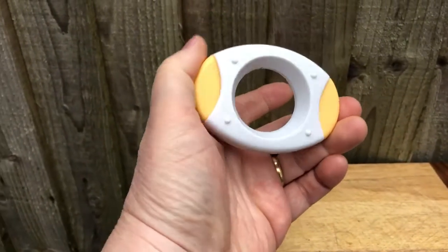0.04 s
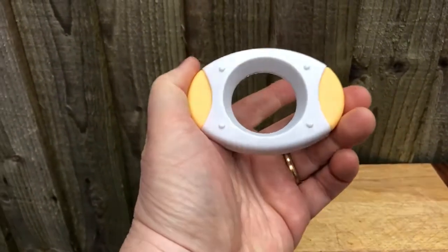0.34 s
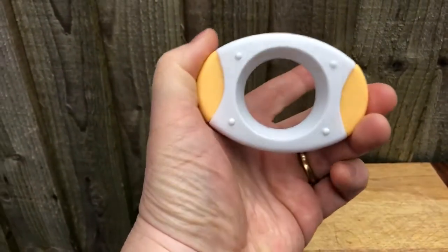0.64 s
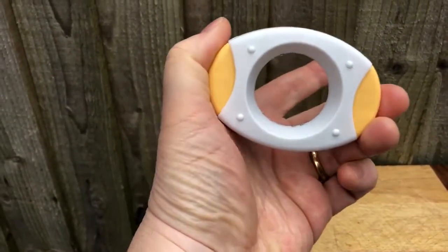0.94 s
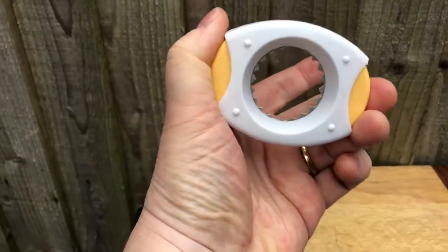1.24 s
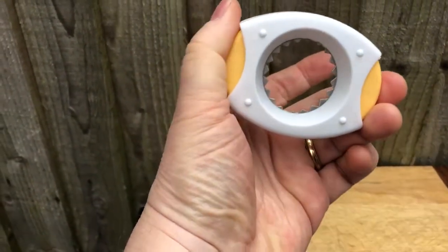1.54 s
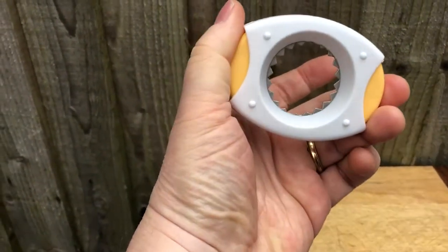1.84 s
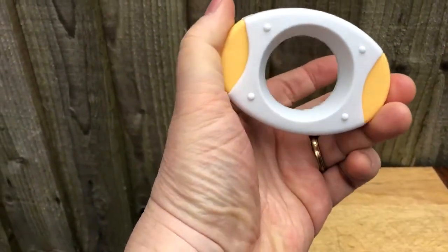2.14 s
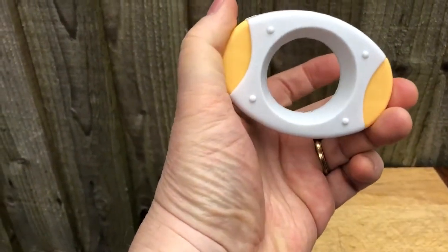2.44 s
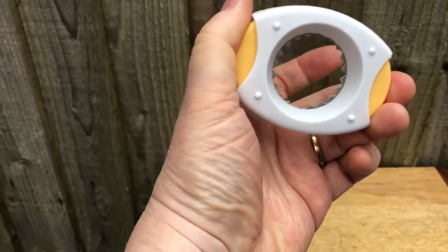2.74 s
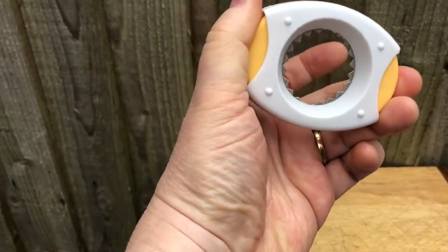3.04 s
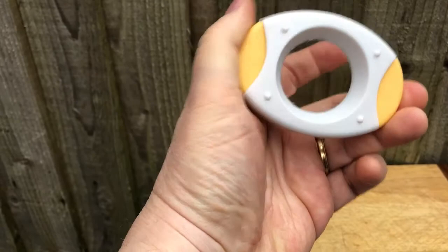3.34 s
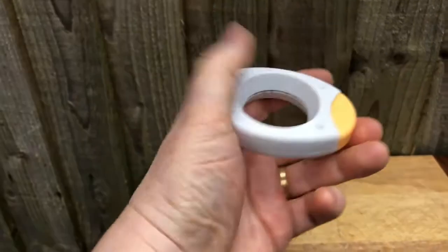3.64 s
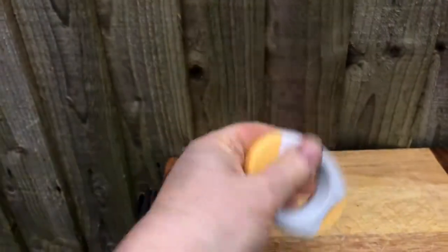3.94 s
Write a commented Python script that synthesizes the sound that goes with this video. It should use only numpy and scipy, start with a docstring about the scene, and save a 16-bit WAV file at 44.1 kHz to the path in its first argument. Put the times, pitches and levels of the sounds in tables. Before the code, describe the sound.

A plastic egg cutter ticks softly and scrapes close by as its handles are squeezed. It snaps sharply at about 2.1 seconds, ticks and scrapes again, gives its loudest hollow snap at 3 seconds, and a quick cluster of clicks near 3.4. Fingers rub softly on the plastic from 3.7 seconds. Throughout, a distant bird gives raspy notes, then falling whistles, over a faint outdoor rumble.

```python
"""Light plastic ticks, close by, as an egg cutter is squeezed and released twice in a fenced garden.
Its handles stick, slip and scrape, then snap against their stops and ring the hollow shell.
The steel teeth ring in sympathy; skin rustles on the plastic; hand, table and fence reflect it all.
Behind it a bird gives raspy notes and long falling whistles over a faint outdoor rumble."""
import sys
import numpy as np
from scipy import signal
from scipy.fft import rfft, irfft
from scipy.io import wavfile

SR = 44100
rng = np.random.default_rng(int(sys.argv[2]) if len(sys.argv) > 2 else 0)


def waveform_to_disk(signal):
    """Save audio, clipped to [-1, 1], as 16-bit WAV at the path in sys.argv[1]."""
    frames = np.transpose(np.atleast_2d(signal))
    scaled = np.clip(frames, -1, 1) * 32767
    samples = np.round(scaled).astype(np.int16)
    wavfile.write(sys.argv[1], SR, samples)


N = 176400

# light catches of handles and spring (time [s], dull level [dB], cavity pitch [Hz], bright level [dB])
TICK_EVENTS = [(0.0014, -46.5, 2350, -44), (0.0772, -50.5, 1880, -65), (0.3235, -52, 1940, -67),
               (0.4224, -48, 2150, -80), (0.6265, -54, 1960, -54.5), (0.647, -52.5, 1810, -55),
               (0.6663, -52, 1880, -63), (.988, -57, 1790, -58), (1.179, -44.5, 1840, -77),
               (1.2266, -43, 1900, -58), (1.269, -44.5, 1980, -78), (1.3205, -44.5, 1780, -78),
               (1.3501, -45.5, 2550, -71.5), (1.4366, -56, 1850, -62), (1.4558, -51, 1780, -61.5),
               (1.4742, -50, 1810, -67), (1.493, -47.5, 1830, -79), (1.5107, -53.5, 1820, -62),
               (1.55, -52.5, 1810, -74), (1.5738, -54, 1820, -94), (1.6014, -53, 1860, -66.5),
               (2.076, -43.5, 1820, -67), (2.1494, -46, 1970, -51), (2.2316, -42.5, 1825, -38.5),
               (2.253, -36, 1970, -75), (2.266, -39.5, 2020, -60), (2.2823, -32.5, 2083, -47),
               (2.608, -37, 1840, -38.5), (2.6663, -34, 1806, -48), (2.7229, -43, 1740, -54),
               (2.836, -41, 1885, -47.5), (2.8596, -40, 1930, -56), (3.5657, -51.5, 2100, -63),
               (3.6575, -47.5, 1930, -50)]
# dull clack of a catch (frequency [Hz], level [dB])
CLACK_SPECTRUM = [(400, -12.5), (1300, -13.5), (1900, 1.5), (2700, -4), (3500, -19), (16000, -42)]
# bright contact noise (frequency [Hz], level [dB])
CRACK_SPECTRUM = [(300, -29.5), (850, -25.5), (1500, -10), (2100, -6.5), (3000, -1.5), (5000, 3), (7300, 1),
                  (9000, -7), (12500, 1.5), (16000, -4.5)]
# steel teeth (frequency [Hz], level [dB], t60 [s])
TEETH_MODES = [(3170, -7, .04), (4020, -16, .16), (5220, 0, .05), (6635, -3, .05), (7560, -24, .3)]
# reflections (frequency [Hz], level [dB])
ECHO_SPECTRUM = [(200, -3), (1800, -2), (5000, -2.5), (8000, -3), (12000, -6.5), (16000, -8)]
# outdoor background (frequency [Hz], level [dB])
AIR_SPECTRUM = [(20, -24), (33, -16), (50, 2), (72, 3), (100, -5), (170, -5.5), (350, -12), (1600, -22.5),
                (7700, -34), (16000, -40)]
# raspy bird notes, one curve each (time [s], pitch [Hz], level [dB])
RASP_CURVES = [
    [(.01, 4324, -60), (.07, 3926, -58), (.15, 3876, -70), (.22, 3800, -53.5), (.31, 3670, -82)],
    [(.31, 3440, -60), (.35, 3287, -55.5), (.43, 3250, -56), (.47, 3230, -62)],
]
# bird whistles, one curve each (time [s], pitch [Hz], level [dB])
WHISTLE_CURVES = [
    [(.47, 4055, -60.5), (.56, 3952, -46), (.63, 3874, -64.5), (.92, 3924, -82)],
    [(.72, 9100, -76), (.91, 8550, -77), (1.0, 7800, -66), (1.12, 6500, -66), (1.21, 6300, -64),
     (1.37, 5150, -83)],
    [(1.65, 9120, -74), (1.81, 7730, -59), (1.885, 6720, -50), (1.95, 6250, -69.5), (2.11, 5240, -72),
     (2.31, 4530, -71.5), (2.54, 3870, -74.5)],
    [(3.16, 5080, -91), (3.25, 4740, -65), (3.39, 4388, -71), (3.56, 3840, -68)],
    [(.19, 4315, -63), (.33, 4240, -72)],
    [(.13, 2660, -65), (.21, 2700, -73)],
    [(1.86, 3800, -84), (2.03, 3250, -69.5)],
]
# plastic on plastic (start [s], peak [s], end [s], hiss [dB], body [dB], fall to ends [dB])
SLIDE_STROKES = [(.98, 1.21, 1.5, -66, -66, 12), (2.122, 2.17, 2.297, -57, -58, 4),
                 (2.63, 2.76, 2.868, -54.5, -58, 13), (3.402, 3.443, 3.466, -45, -43, 9)]
# sliding hiss (frequency [Hz], level [dB])
HISS_SPECTRUM = [(500, -5.5), (1500, 1.5), (3000, 0), (6700, 1), (8800, -7.5), (11000, -1), (13500, -6.5),
                 (16000, 1)]
# body stirred by sliding (frequency [Hz], level [dB])
BODY_SPECTRUM = [(300, -21), (1450, -22), (1850, 5), (2300, -2.5), (2900, -13), (16000, -55.5)]
# hard handle contacts (time [s], cavity pitch [Hz], cavity [dB], shell [dB], crack [dB], knock [dB])
SNAP_EVENTS = [(2.117, 2100, -61, -71, -24, -60), (2.1199, 2070, -20.5, -23.5, -10.5, -37),
               (3.0033, 1715, -9.5, -16.5, -4, -36), (3.0046, 1827, -5.5, -10, -14.5, -23.5),
               (3.3971, 1980, -32.5, -49.5, -51, -67), (3.4096, 1920, -33, -25.5, -33, -68.5),
               (3.4121, 1930, -21.5, -25.5, -20.5, -62.5), (3.4371, 1840, -46, -37, -50, -56),
               (3.4464, 1880, -13, -44, -22, -44), (3.4468, 1814, -16, -27, -34, -32),
               (3.4704, 1874, -30, -52, -66, -61)]
# plastic shell (frequency [Hz], level [dB], t60 [s])
SHELL_MODES = [(2170, -1.5, 0.02), (2866, -4, 0.016), (3340, -2.5, 0.014), (4260, 2.5, 0.01),
               (4900, -2, 0.016), (5185, -3.5, 0.016), (6840, -4, .016), (7860, -3, .02), (8020, -7, 0.02),
               (9490, -11, 0.022), (10070, -8, 0.02), (11320, -4, 0.012), (12230, -7, .015),
               (13200, -5.5, .016)]
# low modes of the whole body (frequency [Hz], level [dB], t60 [s])
KNOCK_MODES = [(155, -24, .08), (600, -14.5, 0.011), (1165, 2, 0.019)]
# palm tightening its grip (frequency [Hz], level [dB])
GRIP_SPECTRUM = [(100, -8), (1400, 2), (3000, -4.5), (16000, -38)]
# finger rubs as the cutter is lowered (start [s], peak [s], end [s], fall to ends [dB], level [dB])
RUB_STROKES = [(3.706, 3.774, 3.82, 12.5, -60), (3.81, 3.936, 4.3, 14, -47)]
# fingers on the shell (frequency [Hz], level [dB])
RUB_SPECTRUM = [(290, -28), (550, -27), (1250, -25), (2130, 3), (2930, -14), (6000, -17.5), (6640, -10.5),
                (7890, -18.5), (15500, -16)]

RING_SAMPLES, RING_RISE_S = 6000, 0.0005


def undb(db):
    """Decibels to gain."""
    return 10 ** (np.asarray(db) / 20)


def fade(t, t60_s):
    """Exponential decay, 60 dB in t60_s."""
    return np.exp(-np.log(1000) * t / t60_s)


def colour(x, spectrum):
    """Shape x by (frequency [Hz], level [dB]) points; rms 1."""
    hz, db = np.array(spectrum, float).T
    bins_hz = np.maximum(np.fft.rfftfreq(len(x), 1 / SR), 1)
    gain = undb(np.interp(np.log(bins_hz), np.log(hz), db))
    shaped = irfft(rfft(x) * gain, len(x))
    return shaped / np.sqrt(np.mean(shaped ** 2))


def noise(spectrum, size=N):
    """Coloured noise, rms 1."""
    return colour(rng.standard_normal(size), spectrum)


def walk(rate_per_s):
    """Random wander, spread near 1."""
    return np.interp(np.arange(N) / SR * rate_per_s, np.arange(N), rng.standard_normal(N))


def add(out, start_s, sound):
    """Mix sound into out at start_s."""
    i = max(int(start_s * SR), 0)
    out[i:i + len(sound)] += sound[:max(N - i, 0)]


def cavity(hz, t, t60_s):
    """Air in the shell swells and rings; handle position sets the pitch."""
    return np.sin(2 * np.pi * hz * t) * (1 - np.exp(-t / RING_RISE_S)) * fade(t, t60_s)


def contact(spectrum, t, t60_s, rise_s=0.00049):
    """Noise burst of two rough faces meeting."""
    return noise(spectrum, size=len(t)) * (1 - np.exp(-t / rise_s)) * fade(t, t60_s)


def ring(modes, t):
    """Struck modes, alternating in sign."""
    return sum((-1) ** k * undb(db) * fade(t, t60_s) * np.sin(2 * np.pi * hz * t)
               for k, (hz, db, t60_s) in enumerate(modes))


def ticks(spread_db=5):
    """Handles stick and slip: soft cavity pips, some with a bright ping of the teeth."""
    out, t = np.zeros(N), np.arange(RING_SAMPLES) / SR
    for start_s, dull_db, hz, bright_db in TICK_EVENTS:
        pip = undb(2.5) * cavity(hz, t, t60_s=0.024)
        clack = undb(-2) * contact(CLACK_SPECTRUM, t, t60_s=0.014)
        # each contact point favours other modes
        modes = [(mode_hz, db - spread_db * rng.exponential(), t60_s)
                 for mode_hz, db, t60_s in TEETH_MODES]
        ping = undb(-14) * ring(modes, t)
        crack = undb(5.5) * contact(CRACK_SPECTRUM, t, t60_s=0.008)
        add(out, start_s, undb(dull_db) * (pip + clack) + undb(bright_db) * (ping + crack))
    return out


def echo(x, t60_s, split_hz=8190, treble_t60_ratio=0.85):
    """Diffuse reflections with a unit-energy tail; treble dies first."""
    t, wash = np.arange(SR) / SR, noise(ECHO_SPECTRUM, size=SR)
    low, high = (signal.sosfilt(signal.butter(5, split_hz, kind, fs=SR, output="sos"), wash)
                 for kind in ("low", "high"))
    tail = low * fade(t, t60_s) + high * fade(t, t60_s * treble_t60_ratio)
    return signal.fftconvolve(x, tail / np.sqrt(np.sum(tail ** 2)))[:N]


def air(level_db=-63.5):
    """Faint outdoor rumble and hiss."""
    return undb(level_db) * noise(AIR_SPECTRUM)


def bird_note(curve, waver_hz, edge_s=0.0043):
    """One gliding tone; fast pitch tremble roughens it."""
    t = np.arange(N) / SR
    times_s, hz, db = np.array(curve).T
    pitch_hz = np.interp(t, times_s, hz) + waver_hz * walk(rate_per_s=640)
    gate = np.clip(np.minimum(t - times_s[0], times_s[-1] - t) / edge_s, 0, 1)
    amplitude = np.sqrt(2) * gate * undb(np.interp(t, times_s, db))
    return amplitude * np.sin(2 * np.pi * np.cumsum(pitch_hz) / SR)


def bird(gain_db=-6.5, echo_db=-6.5, flicker_db=2.5):
    """Distant rasps and whistles, flickering in level, smeared by echoes."""
    whistles = sum(bird_note(curve, waver_hz=75) for curve in WHISTLE_CURVES)
    rasps = sum(bird_note(curve, waver_hz=200) for curve in RASP_CURVES)
    calls = (whistles + rasps) * undb(flicker_db * walk(rate_per_s=63))
    return undb(gain_db) * (calls + undb(echo_db) * echo(calls, t60_s=0.6))


def stroke(start_s, peak_s, end_s, fall_db, edge_s=0.0055):
    """Envelope of a movement: swell, peak, ease off."""
    t = np.arange(N) / SR
    gate = np.clip(np.minimum(t - start_s, end_s - t) / edge_s, 0, 1)
    return gate * undb(np.interp(t, [start_s, peak_s, end_s], [-fall_db, 0, -fall_db]))


def slides(slips_per_s=1500, spread_db=4, slip_t60_s=0.005, patches_per_s=110, patch_db=1.5, band_db=2):
    """Dense tiny slips hiss and stir the body, in patches as the faces grip and let go."""
    onsets = rng.random(N) < slips_per_s / SR
    slips = onsets * undb(spread_db * np.minimum(rng.exponential(size=N), 4))
    energy = signal.lfilter([1], [1, -fade(1 / SR, slip_t60_s) ** 2], slips ** 2)
    grit = np.sqrt(energy) * undb(patch_db * walk(patches_per_s))
    hiss, body = (colour(grit * rng.standard_normal(N) * undb(band_db * walk(patches_per_s)), spectrum)
                  for spectrum in (HISS_SPECTRUM, BODY_SPECTRUM))
    return sum(stroke(*times_s, fall_db) * (undb(hiss_db) * hiss + undb(body_db) * body)
               for *times_s, hiss_db, body_db, fall_db in SLIDE_STROKES)


def teeth(jolts):
    """Steel teeth ring in sympathy with each jolt."""
    return signal.fftconvolve(jolts, ring(TEETH_MODES, np.arange(3 * RING_SAMPLES) / SR))[:N]


def knock(t):
    """The whole body gives in the hand: a low knock."""
    modes = sum(undb(db) * fade(t, t60_s) * np.sin(2 * np.pi * hz * t) for hz, db, t60_s in KNOCK_MODES)
    return modes * (1 - np.exp(-t / RING_RISE_S))


def snaps():
    """A handle hits its stop: cavity, shell modes, crack and knock."""
    out, t = np.zeros(N), np.arange(RING_SAMPLES) / SR
    for start_s, hz, cavity_db, shell_db, crack_db, knock_db in SNAP_EVENTS:
        pop = undb(cavity_db) * cavity(hz, t, t60_s=0.021)
        shell = undb(shell_db) * ring(SHELL_MODES, t) / 2
        crack = undb(crack_db) * contact(CRACK_SPECTRUM, t, t60_s=0.01)
        add(out, start_s, pop + shell + crack + undb(knock_db) * knock(t))
    return out


def hand(grip_db=-60.5, flicker_db=0.4):
    """Skin rustles on plastic: a dull grip, then brighter rubs."""
    grip_gain = undb(grip_db) * stroke(start_s=2.56, peak_s=2.62, end_s=2.76, fall_db=6.3)
    rub_gain = sum(undb(db) * stroke(*times_s, fall_db) for *times_s, fall_db, db in RUB_STROKES)
    rustle = grip_gain * noise(GRIP_SPECTRUM) + rub_gain * noise(RUB_SPECTRUM)
    return rustle * undb(flicker_db * walk(rate_per_s=250))


def scene():
    """Cutter and its reflections over bird and air; mono."""
    blows, scrape = snaps(), slides()
    jolts = undb(-40) * scrape + undb(-60) * blows  # teeth held fast at the stops ring less
    cutter = blows + scrape + ticks() + hand() + teeth(jolts)
    near_echo = undb(-24) * echo(cutter, t60_s=0.06)
    garden_echo = undb(-28.5) * echo(cutter, t60_s=0.23)
    return (cutter + near_echo + garden_echo + bird() + air())[None]


def record(dry, cutoff_hz=16000):
    """Steep low-pass on the top treble."""
    return signal.sosfilt(signal.ellip(10, .2, 70, cutoff_hz, fs=SR, output="sos"), dry)


dry = scene()
out = record(dry)
waveform_to_disk(out)
```